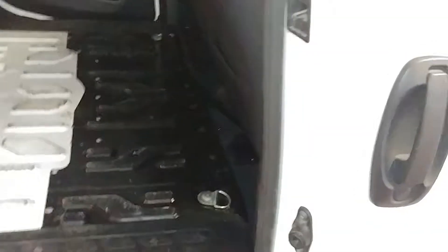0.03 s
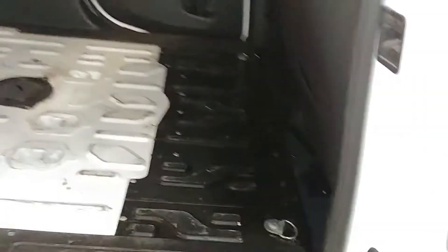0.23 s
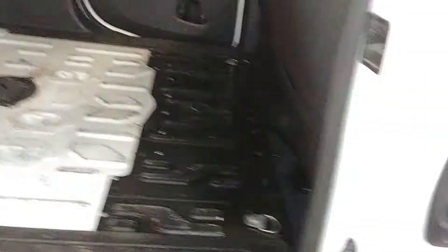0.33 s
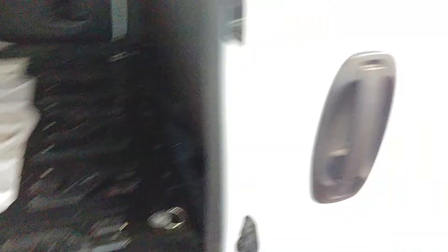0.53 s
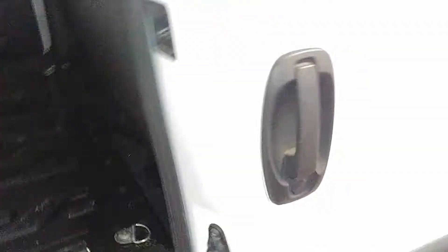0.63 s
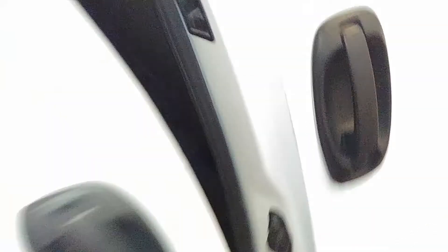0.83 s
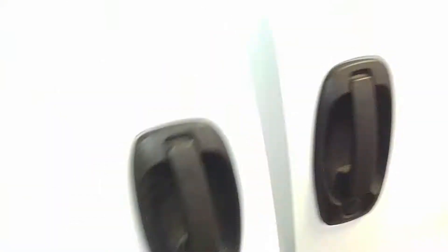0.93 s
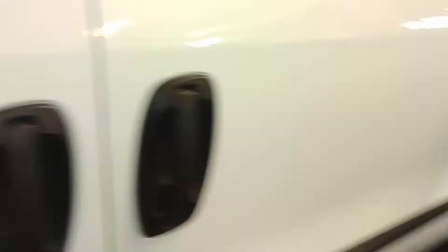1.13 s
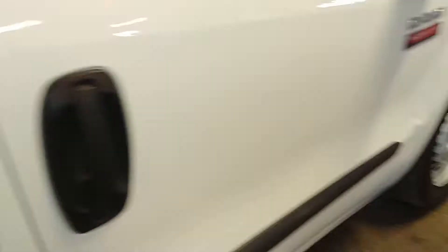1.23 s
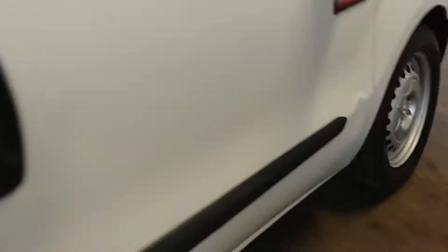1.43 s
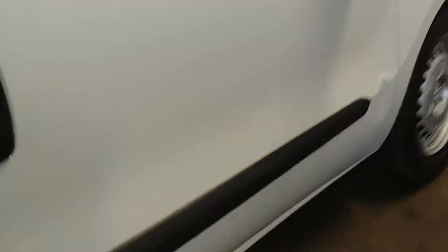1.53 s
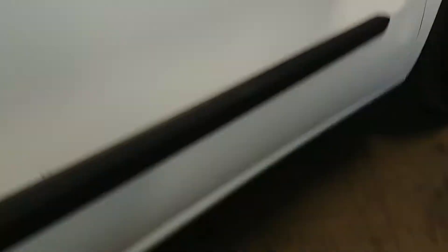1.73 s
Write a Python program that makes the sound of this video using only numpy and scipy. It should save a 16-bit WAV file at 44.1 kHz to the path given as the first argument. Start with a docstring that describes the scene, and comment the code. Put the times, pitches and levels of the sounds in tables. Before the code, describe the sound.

A van's sliding door is shut close by, over low steady air noise and faint hum. Handle clicks at 0.2 seconds lead to a sharp, ringing metal snap at 0.26. Rattles follow near 0.4, then a ticking, jolting roller rumble swells from 0.5 to 1.05. The latch crunches at 1.08; a deep, hollow boom rocks until 1.4, echoing off hard walls, with a tiny late click near 1.7.

```python
"""A van's sliding door is pulled shut close by: clicks, a snap, a ticking rumble, then a crunch and a deep boom.
The handle and catch are filtered noise bursts and decaying sines; dense random knocks on the track make the
rumble and shake the modes of the door skin. The latch crunches home and the body modes boom.
Hard walls return it all as diffuse noise echoes, over low steady noise and a faint hum."""
import sys
import numpy as np
from scipy import signal
from scipy.fft import rfft, irfft
from scipy.io import wavfile
from scipy.ndimage import uniform_filter1d, minimum_filter1d

SR = 44100
rng = np.random.default_rng(int(sys.argv[2]) if len(sys.argv) > 2 else 0)


def put_to_file(sound):
    """Save the sound as 16-bit audio at rate SR, in the file named by the first command-line argument."""
    columns = np.atleast_2d(sound).T  # one column per channel
    safe = np.clip(columns, -1, 1)
    whole_steps = np.round(safe * 32767)
    wavfile.write(sys.argv[1], SR, whole_steps.astype(np.int16))


N = 79380
T = np.arange(N) / SR

# All levels in the tables are relative.
# Handle and door fittings rattling. Each row: start in seconds, level in dB, ring in Hz.
RATTLES = [(.188, -23, 2600), (.208, -25, 7600), (.376, -16, 3900), (.385, -19, 900), (.845, -21, 5400),
           (.8595, -14.5, 3900), (.869, -20.5, 5400), (.928, -21, 3300), (.968, -19, 4000),
           (1.677, -24, 1850)]
# Hold-open catch letting go and rebounding. Each row: start in seconds, level in dB.
SNAPS = [(.2560, 7.5), (.2585, 5), (.268, -20.5), (.274, -19)]
# Ticks of the mechanism and of grit under the rollers. Each row: start in seconds, level in dB, ring in Hz.
TICKS = [(.191, -33, 7640), (.325, -23.5, 8450), (.5825, -23.5, 8000), (.6045, -19, 7700),
         (.628, -22, 8100), (.641, -18.5, 5300), (.6835, -21.5, 7570), (.689, -26, 5700),
         (.7215, -23, 5370), (.860, -25.5, 5500)]
# Jolts of the whole door. Each row: start in seconds, level in dB, panel ring in Hz.
JOLTS = [(.245, -3, 166), (.270, 0.5, 313), (.318, -7.5, 124), (.566, -2.5, 232), (.648, -7.5, 406),
         (.820, -0.5, 594.4), (.832, 5.5, 233), (.884, -1, 330.4), (.963, 3.5, 198), (1.042, 3.5, 184),
         (1.092, -2, 536)]
# Latch claw meeting the striker. Each row: start in seconds, level in dB.
LATCH = [(1.078, -5), (1.084, 0), (1.089, 2), (1.097, -3.5), (1.114, -10.5)]
# Door pressing into its seals and rocking back. Each row: start in seconds, level in dB, boom in Hz.
THUDS = [(1.110, 6.5, 127), (1.150, 2.5, 135.7), (1.182, 5.5, 97), (1.305, -4, 77), (1.400, 0, 64.4)]
# Rolling loudness. Each row: time in seconds, rollers in dB, drumming of the door skin in dB.
ROLL = [(.16, -31, -41), (.3, -29, -44), (0.419, -29.5, -23), (.52, -21.5, -16.5), (0.611, -17, -20.5),
        (.74, -12.5, -16.5), (0.818, -11, -15), (.94, -18.5, -11.5), (1.02, -15.5, -23.5),
        (1.10, -14.5, -18), (1.199, -24, -16.5), (1.3, -81, -81)]

# Modes of door skin, van body, catch and claw. Each row: frequency in Hz, level in dB, T60 in seconds.
SKIN_MODES = [(135.2, -4, 0.22), (153.55, -2.5, 0.7), (192, 1.5, 0.21), (212, 4.5, 0.16), (260.9, 3, 0.27),
              (332.7, -5.5, 0.36), (348.2, -12.5, 0.54), (399, -22, 0.16), (431, -14, 0.13),
              (502.7, -7, 0.28), (668, -20, 0.41)]
BODY_MODES = [(60.2, -19, 0.51), (78.8, 9, 0.59), (96.75, 6, 0.43), (106.2, 11, 0.73), (143.7, 9, 0.55),
              (195, -18, 0.81)]
CATCH_MODES = [(319.5, 6.5, 0.41), (1440, -8, .15), (1690, 4, 0.3), (1780, 0, 0.24), (1842, 10.5, 0.13),
               (2034, -3, 0.16), (2160, 1, 0.11), (2550, -5, 0.39), (6000, 6, 0.079), (7720, -2.5, 0.38),
               (13500, -8, .12)]
CLAW_MODES = [(2044, -1.5, 0.15), (2617, -13, 0.096), (3330, -10.5, 0.062), (3720, -6, 0.062),
              (5900, -10.5, 0.091)]

# Spectra of the contacts, rolling, boom and background air. Each row: frequency in Hz, level in dB per Hz.
RATTLE_TONE = [(150, 5), (300, 13.5), (600, 12.5), (1800, 9.5), (3700, 4), (5500, -4), (6700, -15),
               (8000, -4), (10000, -38.5), (15000, -31)]
SNAP_TONE = [(100, -2), (350, 5), (1000, 4.5), (1900, 8), (3000, -3.5), (5900, -6), (6800, -10),
             (7900, 0.5), (9500, -14), (15000, -20.5)]
TICK_TONE = [(1000, -20.5), (3200, 4.5), (4200, -1), (5400, 10), (6600, -1), (7900, 12), (9500, -6.5),
             (15000, -0.5)]
JOLT_TONE = [(30, -66), (70, -5.5), (130, -2.5), (220, -2), (550, -6), (1200, -23.5), (4000, -36.5),
             (12000, -86)]
LATCH_TONE = [(100, 3), (550, 6), (900, 1), (1500, -3.5), (2100, -4.5), (2900, -9.5), (3800, -13),
              (5700, -16), (8000, -19), (9500, -30.5), (15000, -33)]
ROLL_TONE = [(30, -50), (70, -30.5), (140, -10), (220, 2), (400, -1), (650, -5), (1000, -10), (2000, -20),
             (3000, -25.5), (4000, -38.5), (8000, -41.5), (10000, -73), (15000, -77.5)]
BOOM_TONE = [(28, -26.5), (42, -25.5), (58, 1), (95, -2.5), (190, -8), (400, -15), (1500, -57.5),
             (8000, -105)]
AIR_TONE = [(25, -27), (45, -12), (75, 8), (130, -10), (230, -7.5), (320, -5.5), (375, -9), (450, -15),
            (1000, -13.5), (2200, -20), (4000, -33.5), (8000, -35.5), (10000, -48), (15000, -46.5)]

# Unlikeness of the two sides. Each row: frequency in Hz, side level against mid in dB.
WIDTH = [(80, -16), (250, -12.5), (500, -9), (1100, 1), (8000, 0.5)]
# Lean to the left, open door and shut door, scaled in place(). Each row: frequency in Hz, lean in dB.
OPEN_PAN = [(100, 4.5), (400, 4), (1300, 1), (2400, 2), (4400, 4), (8000, 5.5), (15000, 3.5)]
SHUT_PAN = [(100, 1), (350, 1), (1300, -6.5), (2400, -5), (4400, 4), (8000, -0.5), (15000, -0.5)]
# Decay of the wall echoes. Each row: frequency in Hz, T60 in seconds.
WALLS_T60 = [(80, 1.27), (500, 1.91), (2000, 2.1), (5000, 1.13), (8000, 1.34), (13000, .4)]
# Colour of the wall echoes. Each row: frequency in Hz, gain in dB.
WALLS_TONE = [(60, -6), (200, -5), (600, -1), (1400, -4.5), (2100, -4), (3200, -3), (8000, -7),
              (14000, -18)]
# Microphone response. Each row: frequency in Hz, gain in dB.
MIC = [(22, -20), (48, -0.5), (8500, -3.5), (10800, -13.5), (12500, -7), (16000, -7)]

AIR_DB, HUM_HZ, HUM_DB = -31, 370.3, -36.5  # a machine hums in the background
CATCH_DB, CLAW_DB = -9, -16
SKIN_DB, JOLT_DB = -13, -6
BODY_DB, BOOM_DB = -6.5, -4.5
WALLS_DB, WALLS_BUILD_S = -7, 0.13
BUMPS_PER_S, BUMP_SPREAD_DB = 1600, 3.5  # per roller
BLOW_S = 0.0025  # a 0 dB blow holds the energy of full scale for this long
SEAL_S = 0.0024  # rubber softens the onset of each heavy blow over this time
GRAIN_S, GRAIN_DB = .0012, 2.5  # tiny contacts in a clatter: length, spread in level
LOOSE_S, LOOSE_STEP_S = .00007, .009  # loose steel: how far its timing strays, and how often
TOP_HZ = 15900


def undb(db):
    """Decibels to gain."""
    return 10 ** (np.asarray(db) / 20)


def at(table, hz):
    """Read a table on a log-frequency axis."""
    f, v = np.array(table, float).T
    return np.interp(np.log(np.maximum(hz, 1)), np.log(f), v)


def unit(x):
    """Scale to unit energy, averaged over the channels."""
    return x / np.sqrt(np.mean(np.sum(x ** 2, axis=-1)))


def colour(x, table, power=1):
    """Minimum-phase filter of the tabled dB shape; power scales the dB."""
    size = 2 ** 17
    log_gain = np.log(undb(at(table, np.fft.rfftfreq(size, 1 / SR))))
    cep = irfft(power * log_gain)
    cep[1:size // 2] *= 2  # fold the cepstrum to make it causal
    cep[size // 2 + 1:] = 0
    return irfft(rfft(x, size) * np.exp(rfft(cep)))[..., :N]


def play(push, response):
    """Drive a response with a force, by convolution."""
    return signal.fftconvolve(np.atleast_2d(push), np.atleast_2d(response), axes=-1)[:, :N]


def pair():
    """Stereo noise, alike in the bass and unlike in the treble."""
    mid, side = rfft(rng.standard_normal((2, N)))
    spread = undb(at(WIDTH, np.fft.rfftfreq(N, 1 / SR)))
    sign = np.array([[1], [-1]])
    return irfft((mid + spread * side * sign) / np.hypot(1, spread), N)


def place(x, pan):
    """Lean a sound left or right, band by band."""
    return np.array([colour(x[0], pan, 0.61), colour(x[-1], pan, -0.6)])


def wander(step_s):
    """Random values, one per step, joined by straight lines."""
    return np.interp(T / step_s, np.arange(N), rng.standard_normal(N))


def grains():
    """Uneven strength of the tiny contacts in a clatter, unit rms."""
    return np.sqrt(N) * unit(undb(GRAIN_DB * wander(GRAIN_S)))


def ring(modes, loose=False):
    """Decaying sines of a struck part; a loose part wavers, which blurs its high modes."""
    t = T + loose * LOOSE_S * wander(LOOSE_STEP_S)
    sines = 0
    for hz, db, t60 in modes:
        decay = np.exp(-np.log(1000) * T / t60)
        sines = sines + undb(db) * np.sin(2 * np.pi * hz * t) * decay
    return unit(sines)


def blows(rows):
    """One impulse of force per row."""
    push = np.zeros(N)
    for s, db, *_ in rows:
        push[int(s * SR)] += undb(db) * np.sqrt(BLOW_S * SR)
    return push


def contact(rows, tone, crack_s, panel_db, panel_s, cabin_db, cabin_s):
    """Each blow gives a crack, a clatter of the panels and one in the hollow load bay, as shaped noise."""
    parts = [(0, crack_s), (panel_db, panel_s), (cabin_db, cabin_s)]
    fade = sum(undb(db) ** 2 * np.exp(-2 * T / s) / s for db, s in parts)
    energy = np.maximum(play(blows(rows) ** 2, fade / fade.sum()), 0)
    clatter = np.sqrt(energy) * grains() * pair()
    return play(clatter, unit(colour(signal.unit_impulse(N), tone)))


def spots(rows, rise_s, fade_s):
    """Each blow lands on a different spot, which rings briefly at its own pitch."""
    out = np.zeros(N)
    for s, db, hz in rows:
        t = T[:N - int(s * SR)]
        envelope = (1 - np.exp(-t / rise_s)) * np.exp(-t / fade_s)
        out[-len(t):] += undb(db) * unit(np.sin(2 * np.pi * hz * t) * envelope)
    return out * np.sqrt(BLOW_S * SR)


def background():
    """Steady coloured noise and the sine hum of a machine."""
    air = undb(AIR_DB) * np.sqrt(N) * unit(colour(pair(), AIR_TONE))
    hum = undb(HUM_DB) * np.sqrt(2) * np.sin(2 * np.pi * HUM_HZ * T)
    return air + hum


def wash(t60s):
    """Countless overlapping modes: octave bands of noise, each dying at its own rate."""
    noise, centres = rfft(pair()), np.arange(6, 15)  # log2 Hz
    octave = np.clip(np.log2(np.fft.rfftfreq(N, 1 / SR) + 1), centres[0], centres[-1])
    total = 0
    for c in centres:
        band = irfft(noise * np.maximum(1 - abs(octave - c), 0), N)
        total = total + band * np.exp(-np.log(1000) * T / at(t60s, 2. ** c))
    return total


def walls(x):
    """Diffuse echoes from both sides that build up and die away, each band at its own rate."""
    build = 1 - np.exp(-T / WALLS_BUILD_S)
    echoes = sum(play(side, unit(wash(WALLS_T60) * build)) for side in colour(x, WALLS_TONE))
    return undb(WALLS_DB) * echoes / np.sqrt(2)


def fittings():
    """The handle rattles, the steel catch snaps and rings from its first blow, grit ticks in the track."""
    rattle = contact(RATTLES, RATTLE_TONE, crack_s=0.0062, panel_db=0.5, panel_s=0.012, cabin_db=7.5, cabin_s=0.03)
    snap = contact(SNAPS, SNAP_TONE, crack_s=.003, panel_db=-8, panel_s=.015, cabin_db=-11, cabin_s=.05)
    tick = contact(TICKS, TICK_TONE, crack_s=.0012, panel_db=-2, panel_s=.01, cabin_db=-2, cabin_s=.035)
    rattle_clink = undb(-11) * spots(RATTLES, rise_s=.0003, fade_s=.0012)
    tick_clink = undb(-10) * spots(TICKS, rise_s=.0002, fade_s=.0008)
    catch = undb(CATCH_DB) * play(blows(SNAPS[:1]), ring(CATCH_MODES, loose=True))
    return rattle + snap + tick + rattle_clink + tick_clink + catch


def bumps():
    """Dense small knocks of a roller on its track: impulses of random time, sign and size."""
    chance, size = rng.random(N), rng.standard_normal(N)
    hit = chance < BUMPS_PER_S / SR
    return np.sqrt(N) * unit(hit * np.sign(size) * undb(BUMP_SPREAD_DB * abs(size)))


def rollers():
    """Three rollers rumble in their tracks; they and a few heavy jolts shake the modes of the door skin."""
    s, roll_db, drum_db = np.array(ROLL).T
    roll_gain, drum_gain = undb(np.interp(T, s, roll_db)), undb(np.interp(T, s, drum_db))
    knocks, skin = [bumps() for _ in range(3)], ring(SKIN_MODES)
    rumble = 0
    for knock in knocks:
        track = unit(colour(pair() * np.exp(-T / 0.015), ROLL_TONE))
        rumble = rumble + play(knock * roll_gain, track)
    open_skin = colour(skin, [(30, -24.0), (120, 0)])  # the open door radiates little deep bass
    drum = play(sum(knocks) * drum_gain, open_skin)
    jolt = contact(JOLTS, JOLT_TONE, crack_s=.008, panel_db=2, panel_s=.02, cabin_db=-5, cabin_s=.035)
    shake = play(blows(JOLTS), unit(skin * (1 - np.exp(-T / SEAL_S))))
    flex = spots(JOLTS, rise_s=0.0086, fade_s=0.017)
    return (rumble + drum) / np.sqrt(3) + undb(JOLT_DB) * jolt + undb(SKIN_DB) * shake + undb(-3) * flex


def slam():
    """The steel claw crunches shut and rings; the body and the air inside it boom with each rock."""
    latch = contact(LATCH, LATCH_TONE, crack_s=.005, panel_db=-3, panel_s=.014, cabin_db=-9, cabin_s=.06)
    claw = play(blows(LATCH), ring(CLAW_MODES, loose=True))
    boom = contact(THUDS, BOOM_TONE, crack_s=0.032, panel_db=-10, panel_s=0.023, cabin_db=11.5, cabin_s=0.1)
    body = play(blows(THUDS), unit(ring(BODY_MODES) * (1 - np.exp(-T / SEAL_S))))
    flex = spots(THUDS, rise_s=0.0042, fade_s=0.02)
    return latch + undb(CLAW_DB) * claw + undb(BOOM_DB) * boom + undb(BODY_DB) * body + undb(-7.0) * flex


def scene():
    """Steady background, door, slam and their echoes."""
    steady, clicks, rolling, shut = background(), fittings(), rollers(), slam()
    echo = walls(undb(-11.5) * clicks + undb(-4.5) * rolling + shut)
    far = np.clip((T - 1.3) / 0.12, 0, 1)  # late echoes drift back to the left
    near = np.clip((T - 1.05) / .06, 0, 1) * (1 - far)
    open_side = place(clicks + rolling + steady + (1 - near) * echo, OPEN_PAN)
    shut_side = place(shut + near * echo, SHUT_PAN)
    return open_side + shut_side


def record(dry):
    """Microphone colour, a fast peak limiter and the top cut."""
    x = colour(dry, MIC)
    gain = minimum_filter1d(np.minimum(1, 1 / (abs(x).max(axis=0) + 1e-9)), size=40)
    x = x * uniform_filter1d(gain, size=40)
    return signal.sosfilt(signal.ellip(10, .2, 80, TOP_HZ, fs=SR, output="sos"), x)


dry = scene()
out = record(dry)
put_to_file(out)
```